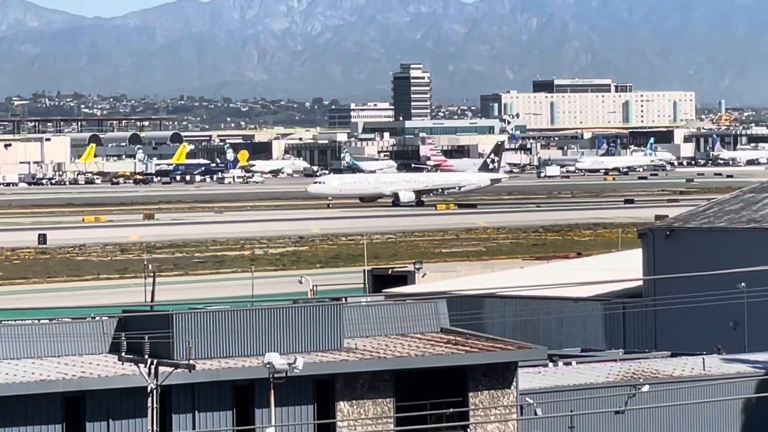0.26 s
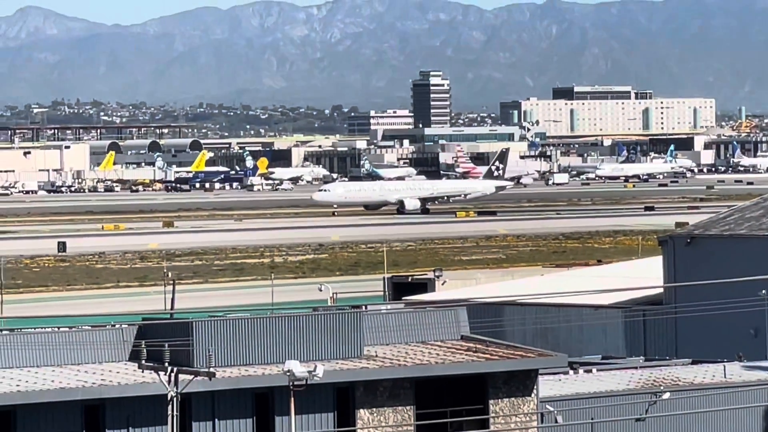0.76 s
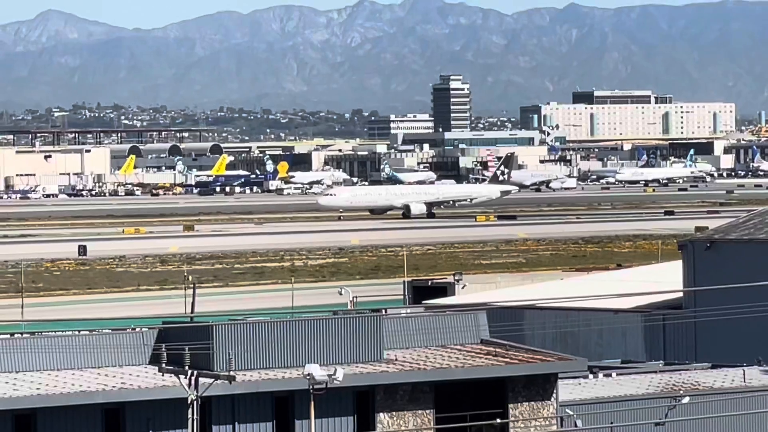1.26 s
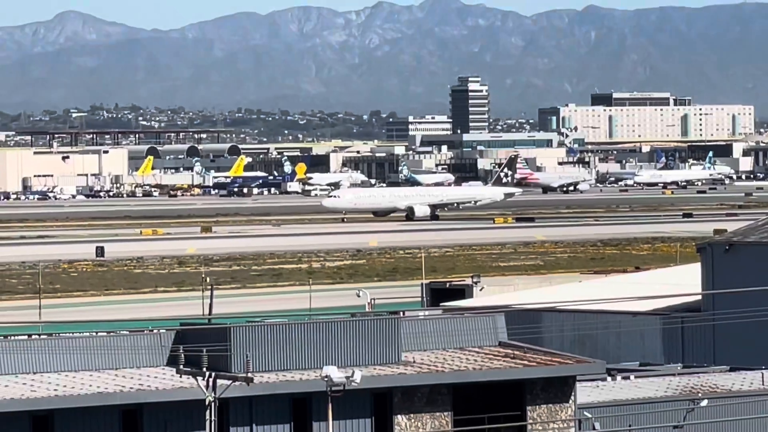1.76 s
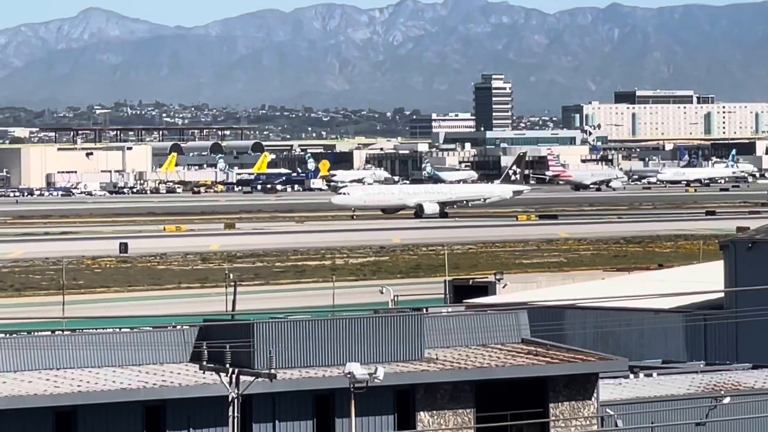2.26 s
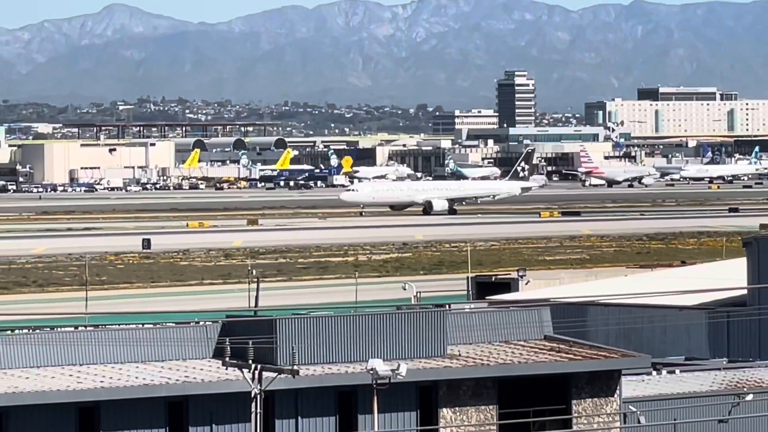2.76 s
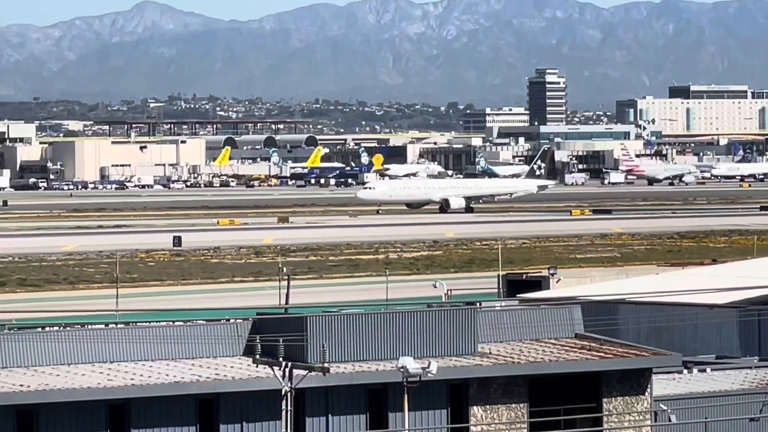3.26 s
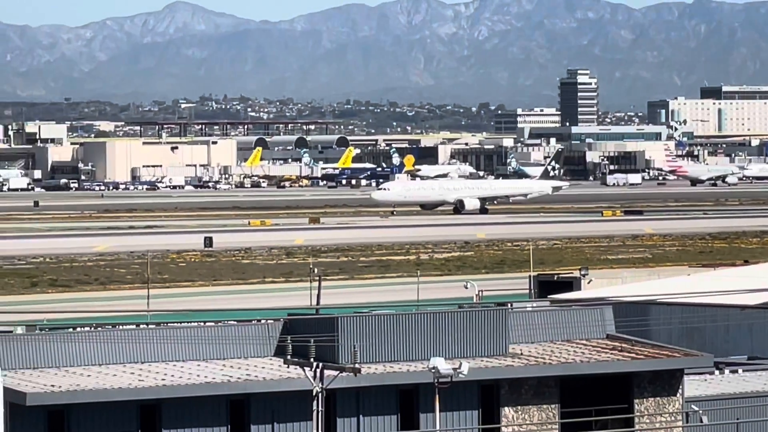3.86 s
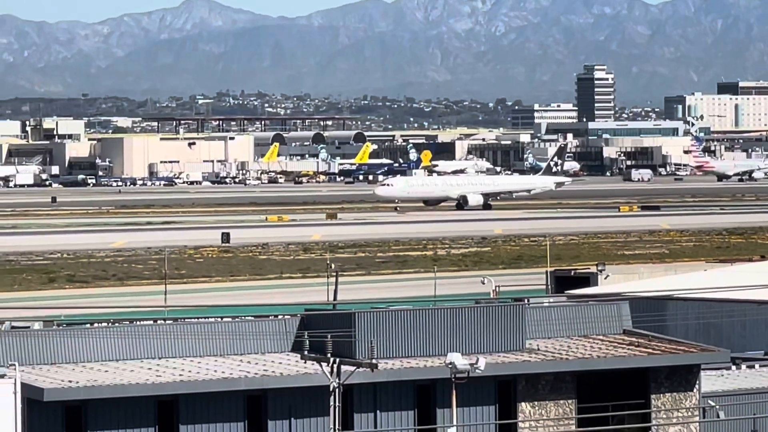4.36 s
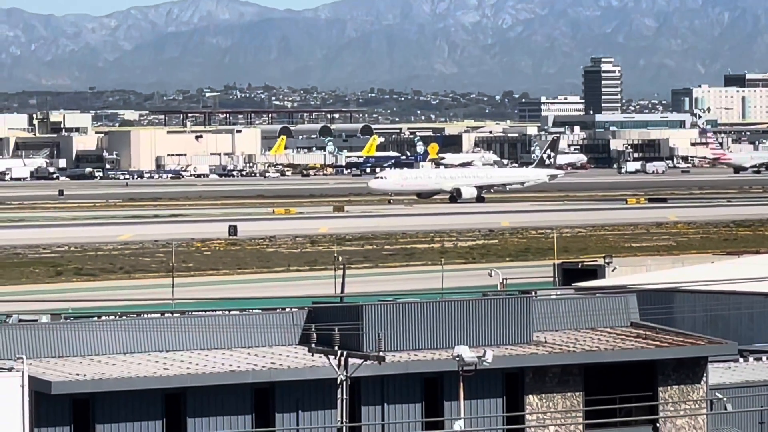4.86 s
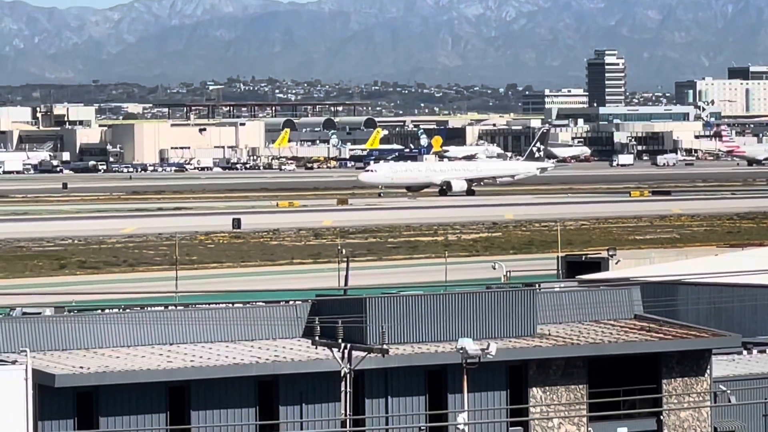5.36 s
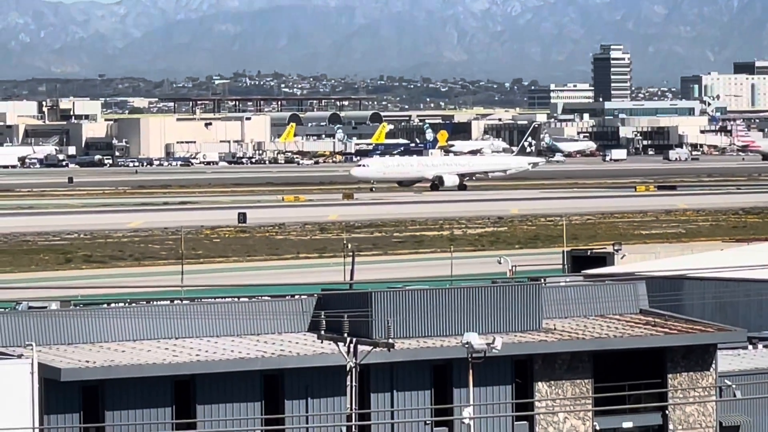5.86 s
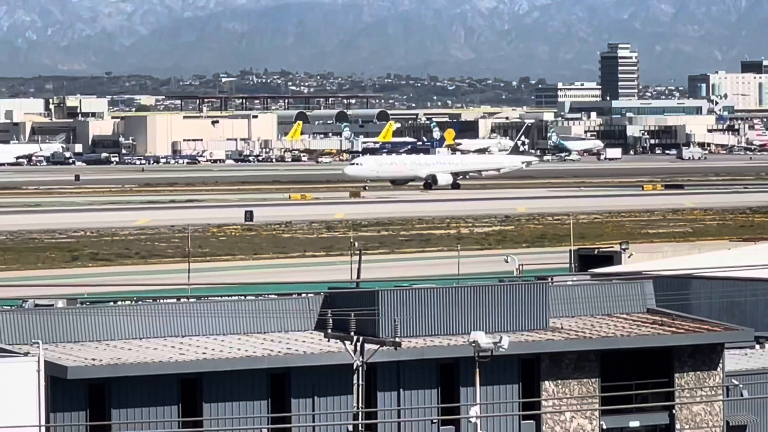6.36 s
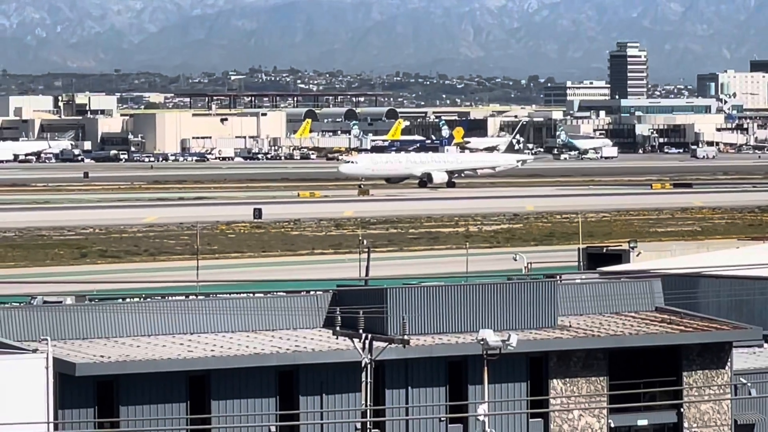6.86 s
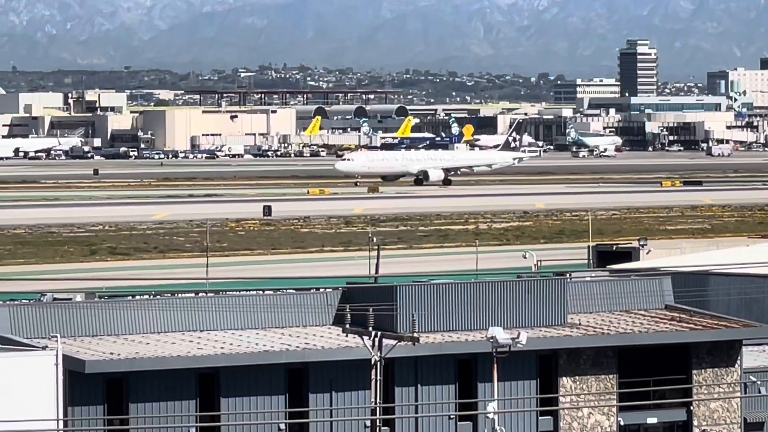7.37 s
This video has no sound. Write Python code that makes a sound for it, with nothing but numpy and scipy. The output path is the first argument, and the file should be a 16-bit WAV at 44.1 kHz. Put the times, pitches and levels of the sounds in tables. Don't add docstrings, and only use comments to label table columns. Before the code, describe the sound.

Outdoor handheld phone capture of a distant airliner rolling away: continuous low-heavy noise, dull on top, gently fluctuating. Faint far chirps and tiny bright case creaks barely show through. Behind roofs an engine drones intermittently, its growl growing until its bass boom dominates in the last second. Steady roof-fan hum and light wind sit beneath.

```python
import sys
import numpy as np
from scipy import signal
from scipy.fft import rfft, irfft
from scipy.io import wavfile
from scipy.ndimage import uniform_filter1d

SR = 44100
rng = np.random.default_rng(int(sys.argv[2]) if len(sys.argv) > 2 else 0)


def materialize(psi):
    bounded = np.clip(np.atleast_2d(psi).T, -1, 1)
    quanta = np.round(bounded * 32767).astype(np.int16)
    wavfile.write(sys.argv[1], SR, quanta)


def volts(x):
    e = np.asarray(x, float) / 20
    return 10 ** e


N = 336042
TIME = np.arange(N) / SR
FREQ = np.maximum(np.fft.rfftfreq(N, 1 / SR), 1)


def on_log(table, hz):
    at, value = np.transpose(table)
    return np.interp(np.log(hz), np.log(at), value)


def level(x, db):
    return x * volts(db) / np.sqrt(np.mean(x ** 2))


def walk(rate):
    hold = int(SR / rate)
    steps = np.repeat(rng.standard_normal(400), hold)[:N]
    return 1.3 * uniform_filter1d(uniform_filter1d(steps, hold), hold)


def band(hz, octaves):
    bell = np.exp(-.5 * (np.log2(FREQ / hz) / octaves) ** 2)
    return level(irfft(rfft(rng.standard_normal(N)) * bell, N), 0)


def pan(x, db):
    return x * volts(np.array([[db], [-db]]) / 2)


# (frequency [Hz], left minus right [dB])
FAR_BALANCE = [(60, -1.5), (91, -1), (140, -1), (210, -0.5), (320, -0.5), (490, 1), (750, 1.5), (1140, 0.5),
               (1730, -1.5), (2640, 0.0)]
# (frequency [Hz], lead of the left port [rad])
PORT_LEAD = [(100, -.06), (180, .25), (270, .33), (520, .3), (900, 0), (2700, .02), (2900, .47),
             (4900, .48), (5600, -.65), (6700, -.9), (7700, -2.1), (8500, -3.1)]


def ports(x):
    tilt = volts(on_log(FAR_BALANCE, FREQ) / 2) * np.exp(.5j * on_log(PORT_LEAD, FREQ))
    return irfft(rfft(x) * np.array([tilt, 1 / tilt]), N)


# (frequency [Hz], density [dB per Hz])
ROAR_COLOUR = [(30, -16), (44, -3), (60, 5.5), (110, -1), (520, -5.5), (610, -9.5), (830, -9), (950, -4),
               (1480, -9.5), (1720, -15.5), (2500, -24.5), (4000, -40.5), (8200, -60.5), (8800, -79.5)]
# (frequency [Hz], level under the shared part [dB])
ROAR_SIDE = [(40, -23), (70, -16.5), (180, -12), (400, -21.5), (700, -7.5), (1140, -15), (1600, -23.5),
             (2700, -29.5), (2900, -13), (4800, -13.5), (6000, -7), (8000, -7.5)]
# (time [s], level [dB])
BEAM = [(0, -0.5), (.7, -0.5), (1.3, 3.5), (1.5, -1.5), (1.93, 2.5), (2.42, -1.5), (3.3, -1), (3.55, 1.5),
        (4.0, 2), (4.31, -1.5), (4.6, 0.5), (5.28, 3), (5.61, -0.5), (6.12, -2), (6.43, -2), (7.62, -4)]
# (frequency [Hz], share [0-1])
BEAM_SHARE = [(400, 0), (700, .2), (1150, 1), (1900, 0.27), (5000, 0)]
# (frequency [Hz], slope [dB per s])
TURN_DB_PER_S = [(62, 0.3), (200, -0.5), (700, .5), (1150, -.5), (1900, -1.52), (5000, 0)]
ROAR_DB, TURN_STARTS_S = -29, 3.45
ON_AXIS_S, NARROWEST_DB, WIDENS_DB_PER_S, WIDEST_DB = 2.8, -8, 3.5, 8.5


def jet(swell_db, flicker_db):
    beam_db = np.interp(TIME, *np.transpose(BEAM))
    beam_db = beam_db - beam_db.mean()
    turned_s = np.maximum(TIME - TURN_STARTS_S, 0)
    turned_s = turned_s - turned_s.mean()
    width_db = np.minimum(NARROWEST_DB + WIDENS_DB_PER_S * abs(TIME - ON_AXIS_S), WIDEST_DB)

    pair = rfft(rng.standard_normal((2, N))) * volts(on_log(ROAR_COLOUR, FREQ))
    pair[1] *= volts(on_log(ROAR_SIDE, FREQ))
    roar = 0
    swell = walk(3.8)
    for step in range(27):
        centre = 24 * 2 ** (step / 3)
        octaves_off = np.log2(FREQ / centre)
        window = np.cos(np.pi / 2 * np.clip(3 * octaves_off, -1, 1)) ** 2
        db = on_log(BEAM_SHARE, centre) * beam_db + on_log(TURN_DB_PER_S, centre) * turned_s
        swell = .8 * swell + .6 * walk(3)
        db = db + swell_db * swell + flicker_db * walk(11)
        piece = irfft(pair * window, N) * volts(db)
        if 700 < centre < 3000:
            piece[1] *= volts(width_db)
        roar = roar + piece
    shared, side = roar
    left, right = ports(shared)
    return level(np.array([left + side, right - side]), ROAR_DB)


# (time [s], level [dB])
THUDS = [
    (2.8, -34),
    (3.7, -35),
    (3.87, -33),
    (5.15, -31),
    (7.0, -26.5),
    (7.38, -34.5),
    (7.55, -25),
]
THUD_HZ, THUD_LENGTH_S = 61, 0.039


def thuds():
    out = 0
    for s, db in THUDS:
        after = TIME - s
        swell = np.exp(-(after / THUD_LENGTH_S) ** 2)
        out = out + volts(db) * swell * np.sqrt(2) * np.sin(2 * np.pi * THUD_HZ * after)
    return pan(out, -.6)


# (time [s], level [dB])
BOOM = [(1.08, -46), (1.3, -31.5), (1.6, -28), (1.85, -37.5), (2.05, -31.5), (2.3, -40), (3.45, -37.5),
        (3.68, -32.5), (4.33, -28), (4.6, -34.5), (4.85, -24.5), (5.09, -30.5), (5.6, -25.5), (6.1, -32.5),
        (6.36, -28.5), (6.66, -14), (6.9, -14), (7.62, -20)]
# (level at the pass [dB], slope [dB per s])
GROWL = [(-53.5, -2), (-45.5, 2), (-48, 2.5), (-40, 1.5), (-44, 2)]
GROWL_ORDERS = [2, 4.5, 5, 5.5, 6]
ECHO_DIP_S, ECHO_DIP_DB, ECHO_DIP_WIDTH_S = 7.02, -2, 0.055
FIRING_HZ, SAG_HZ_PER_S = 88.33, .3
PASSES_S, SPEED_M_S, NEAREST_M = 6.4, 13.7, 11
GROWL_ENTERS_S, GROWL_FADE_S = 2.8, 0.8


def piston_engine(waver, blur, growl_db):
    after = TIME - PASSES_S
    along = SPEED_M_S * after
    doppler = 1 - SPEED_M_S / 343 * along / np.hypot(along, NEAREST_M)
    firing_hz = (FIRING_HZ - SAG_HZ_PER_S * after) * doppler * (1 + waver * walk(6))
    phase = 2 * np.pi * np.cumsum(firing_hz) / SR

    dip_db = ECHO_DIP_DB * np.exp(-((TIME - ECHO_DIP_S) / ECHO_DIP_WIDTH_S) ** 2)
    boom = volts(np.interp(TIME, *np.transpose(BOOM)) + dip_db) * np.sin(phase)

    growl = 0
    for order, (db, db_per_s) in zip(GROWL_ORDERS, GROWL):
        turn = order * phase + blur * walk(12) + np.array([[.35], [-.35]])
        tone_db = db + db_per_s * after + growl_db + 2.5 * walk(9)
        growl = growl + volts(tone_db) * np.sin(turn)
    fade_in = np.clip((TIME - GROWL_ENTERS_S) / GROWL_FADE_S, 0, 1)
    return np.sqrt(2) * (pan(boom, -1.3) + growl * fade_in)


# (pitch [Hz], width [Hz], level [dB])
MACHINES = [
    (60, 5.9, -42.5),
    (128.5, 9.5, -50),
    (152.5, 3.2, -51),
    (226.8, 30, -49),
]
FAN_HZ, FAN_DB = 45.2, -36.5


def roof_fan():
    turn = 2 * np.pi * FAN_HZ * TIME + .25 * walk(2)
    hum = np.sqrt(2) * volts(FAN_DB + 1.1 * walk(5)) * np.sin(turn)
    for hz, width_hz, db in MACHINES:
        hum = hum + volts(db + 0.68 * walk(2)) * band(hz, width_hz / hz / 2)
    return pan(hum, -.6)


def wind(db, gust_db):
    return np.array([volts(db + gust_db * walk(7.4)) * band(87, 0.62) for _ in range(2)])


# (time [s], level [dB], pitch [Hz], length [s])
CHIRPS = [(.56, -75, 7900, .03), (1.21, -71, 6800, .04), (1.2, -70, 5200, .06), (1.3, -69, 5400, .07),
          (1.48, -65, 5300, .08), (1.48, -70, 6800, .08), (1.597, -63, 6300, .025), (1.597, -70, 6900, .03),
          (1.61, -70, 5200, .05), (1.73, -69, 5300, .012), (2.72, -76, 7000, .08), (3.1, -75, 6600, .05),
          (3.52, -70, 6600, .04), (3.6, -74, 6800, .15), (3.8, -72, 6300, .05), (6.54, -69, 5500, .14),
          (6.73, -71, 5400, .03), (6.79, -74, 5450, .1), (6.92, -71, 5450, .1), (7.17, -71, 5500, .16),
          (7.17, -74, 6250, .16), (7.33, -74, 5500, .08), (7.5, -73, 5500, .1)]


def far_scrapes(width_hz):
    out = np.zeros(N)
    t = np.arange(int(.3 * SR)) / SR
    smooth = np.hanning(int(SR / width_hz))
    for s, db, hz, length in CHIRPS:
        shape = np.clip(t / .004, 0, 1) * np.exp(-(t / length) ** 3)
        a, b = (np.convolve(v, smooth, "same") for v in rng.standard_normal((2, len(t))))
        breath = a * np.sin(2 * np.pi * hz * t) + b * np.cos(2 * np.pi * hz * t)
        chirp = shape * level(breath, db - 1.5)
        room = out[int(s * SR):][:len(t)]
        room += chirp[:len(room)]
    return ports(out)


# (time [s], peak level [dB], pitch [Hz])
CREAKS = [(0.3278, -63, 11460), (0.4604, -72.5, 10340), (1.0994, -75, 10100), (1.1594, -71, 10760),
          (1.2161, -66.5, 13000), (2.4249, -75, 10000), (2.4917, -64.5, 12800), (2.6002, -69.5, 12740),
          (2.674, -68.5, 10860), (2.781, -83, 13060), (2.8094, -76, 10440), (2.8539, -64.5, 12050),
          (2.9562, -61.5, 12200), (3.35, -73, 12530), (3.7192, -76, 12770), (4.1692, -56, 13180),
          (4.1777, -63, 11830), (6.7897, -65, 11900), (6.8249, -62.5, 9960), (6.86, -71, 11830)]


def creaks(t60):
    out = np.zeros(N)
    t = np.arange(int(.08 * SR)) / SR
    for s, db, hz in CREAKS:
        grain = np.convolve(rng.standard_normal(len(t)), np.hanning(14) / 5, "same")
        tick = grain * np.cos(2 * np.pi * hz * t)
        out[int(s * SR):][:len(t)] += volts(db) * tick * 1000 ** (-t / t60)
    return pan(out * volts(-3.0), .4)


# (time [s], level [dB], length [s])
GRIPS = [
    (1.03, -94, .25),
    (2.72, -87.5, .13),
    (3.72, -91.5, .12),
    (6.24, -95.5, .08),
    (7.197, -98.5, .5),
]
RUSTLE_DB = -100


def hand_rustle():
    strength = volts(RUSTLE_DB)
    for s, db, length in GRIPS:
        strength = strength + volts(db) * np.exp(-((TIME - s) / length) ** 2)
    return strength * volts(3.5 * walk(18)) * band(12100, 0.17)


def scene():
    far = jet(swell_db=.5, flicker_db=1.1) + thuds() + far_scrapes(width_hz=280)
    near = piston_engine(waver=.002, blur=1.8, growl_db=-2) + roof_fan()
    return far + near + wind(db=-55.5, gust_db=1.0) + creaks(t60=0.11)


def top_cut(x):
    return signal.sosfilt(signal.butter(12, 15800, fs=SR, output="sos"), x)


def record(dry):
    dry = dry * np.clip(TIME / .004, 0, 1)
    mirror = volts(-67) * dry * np.cos(2 * np.pi * 12000 * TIME)
    return top_cut(dry + mirror + hand_rustle())


dry = scene()
out = record(dry)
materialize(out)
```